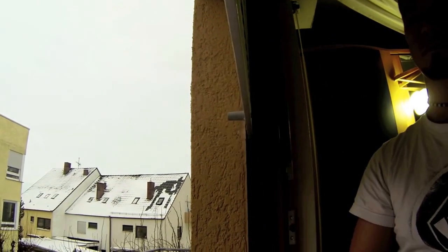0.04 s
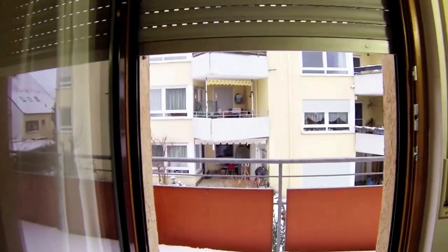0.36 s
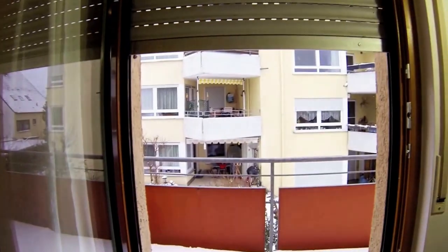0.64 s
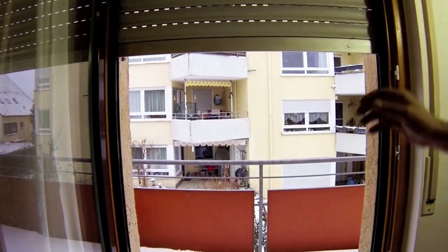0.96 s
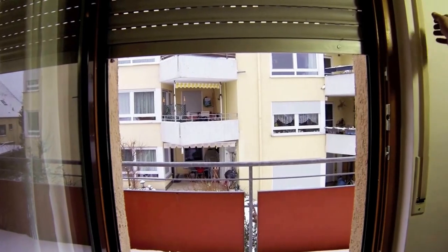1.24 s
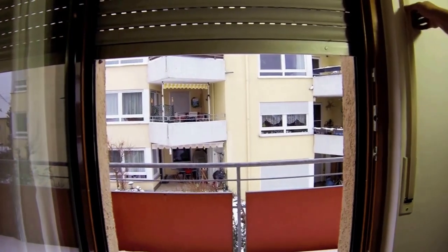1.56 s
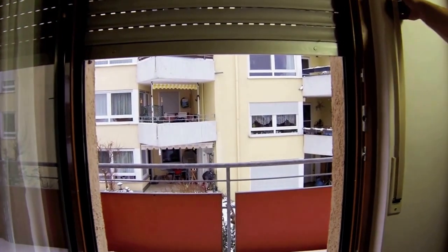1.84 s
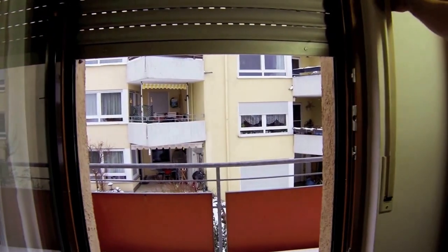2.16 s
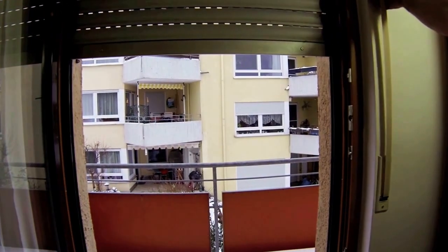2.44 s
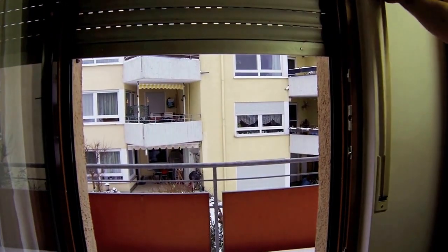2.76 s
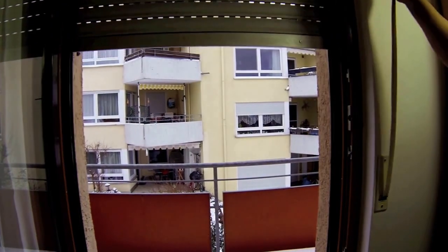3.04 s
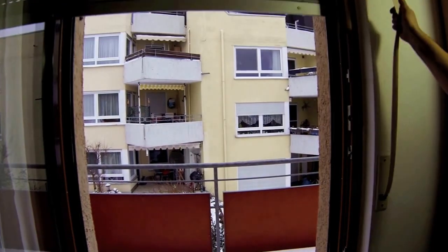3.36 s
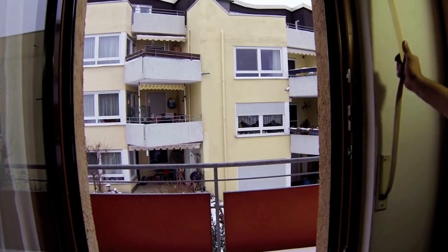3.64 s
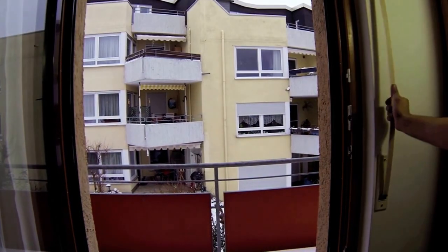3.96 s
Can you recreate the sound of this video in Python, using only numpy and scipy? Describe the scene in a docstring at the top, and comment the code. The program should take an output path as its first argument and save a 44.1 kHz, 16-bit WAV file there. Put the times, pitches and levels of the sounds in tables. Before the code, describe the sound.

Hands work a roller shutter strap, heard close through a plastic microphone case. A very faint outdoor hiss stops at 0.3 seconds. From 0.4 come irregular knocks, hollow taps, scuffs and rubbing over low thumps, with the sharpest knocks near 1.2 and 2 seconds and a short creak around 1.6. After 2.7 the handling softens, and the woven strap swishes at about 3.9.

```python
"""Inside a small plastic microphone case: hands grip a roller shutter's strap and haul the shutter up. Knocks,
hollow taps, scuffs and rubbing ring the case; each movement thumps and rumbles through it. Faint digital clicks
ride on the handling. The grip creaks once, and late on the woven strap swishes. The sound opens on a different
scene, a faint outdoor hiss with a few thin tones; after a third of a second the scene changes to the case, with
a brief hush between."""
import sys
import numpy as np
from scipy import signal
from scipy.fft import rfft, irfft
from scipy.io import wavfile
from scipy.ndimage import uniform_filter1d

SR = 44100
rng = np.random.default_rng(int(sys.argv[2]) if len(sys.argv) > 2 else 0)


def log_audio(samples):
    """Write samples as a 16-bit WAV file to the path given in sys.argv[1]."""
    # one column per channel
    frames = np.atleast_2d(samples).T
    # limit to full scale, then quantise
    limited = np.clip(frames, -1, 1)
    pcm = np.round(limited * 32767).astype(np.int16)
    wavfile.write(sys.argv[1], SR, pcm)


N = 176400
HIT_SAMPLES = 8192
TIME_S, HIT_TIME_S = np.arange(N) / SR, np.arange(HIT_SAMPLES) / SR
DIGITAL_TICK_HZ = (2000, 6500)


def from_db(db):
    """Decibels to gain."""
    return 10 ** (np.asarray(db) / 20)


def unit_rms(x):
    """Scale to unit power."""
    return x / np.sqrt(np.mean(x ** 2) + 1e-30)


def level(points):
    """Gain over time from (s, dB) points."""
    return from_db(np.interp(TIME_S, *np.transpose(points)))


def colour(x, points):
    """Shape a spectrum by (Hz, dB) points, falling off past the ends."""
    hz, db = np.transpose(points)
    log_f = np.log(np.maximum(np.fft.rfftfreq(N, 1 / SR), 1))
    outside = np.maximum(np.log(hz[0]) - log_f, 0) + np.maximum(log_f - np.log(hz[-1]), 0)
    return irfft(rfft(x) * from_db(np.interp(log_f, np.log(hz), db) - 20 * outside), N)


def noise(points):
    """Coloured noise of unit power."""
    return unit_rms(colour(rng.standard_normal(N), points))


def cut(x, hz, kind, order=2):
    """Butterworth filter."""
    return signal.sosfilt(signal.butter(order, hz, kind, fs=SR, output="sos"), x)


def flutter(depth_db, hz):
    """Gain wavering at random up to the given rate."""
    return from_db(depth_db * unit_rms(cut(rng.standard_normal(N), hz, "low")))


def ring(x, hz, t60_s):
    """One mode: a unit click rings with height 1."""
    r, w = np.exp(-np.log(1000) / (t60_s * SR)), 2 * np.pi * hz / SR
    return signal.lfilter([0, np.sin(w)], [1, -2 * r * np.cos(w), r * r], x + 1e-18)


def add(out, start_s, x):
    """Mix x into out."""
    i = int(start_s * SR)
    out[i:i + len(x)] += x[:N - i]


def impulses(samples, per_s=2600):
    """Random unit impulses of either sign."""
    return (rng.random(samples) < per_s / SR) * rng.choice([-1, 1], samples)


def outdoors():
    """Faint hiss with thin tones."""
    # Each row: frequency in Hz, level in dB.
    thin_tones = [(221, -68.5), (1455, -84.5), (7690, -101)]
    # Hiss spectrum. Each row: frequency in Hz, gain in dB.
    hiss_colour = [(130, -18), (230, 4), (800, -6.5), (1300, -1), (2200, -15.5), (5000, -23.5),
                   (10000, -27.5), (14000, -37)]
    tones = sum(from_db(db) * unit_rms(ring(rng.standard_normal(N), hz, t60_s=0.26))
                for hz, db in thin_tones)
    return from_db(-75.5) * noise(hiss_colour) + tones


def background(hush_from_s=0.308, hush_to_s=0.384, hush_db=-17, fade_s=0.02):
    """Low sway of the case and quiet room noise; both dip briefly as the outdoor sound stops."""
    # Each row: time in seconds, level in dB.
    sway_level = [(0, -43), (.31, -64), (.41, -51), (.57, -48.5), (1.6, -47), (2.72, -46), (2.83, -53),
                  (2.95, -49), (3.5, -49), (4, -54)]
    # Sway spectrum. Each row: frequency in Hz, gain in dB.
    sway_colour = [(15, -9), (27, -3), (42, -10), (62, -7), (85, -27.5), (400, -65.5)]
    # Room noise spectrum. Each row: frequency in Hz, gain in dB.
    room_colour = [(300, 0.5), (4000, -23), (15000, -29)]
    before, after = (uniform_filter1d(gate * 1., int(fade_s * SR))
                     for gate in (TIME_S < hush_from_s, TIME_S > hush_to_s))
    opening = before * outdoors()
    floor = noise(sway_colour) * level(sway_level) + from_db(-88) * noise(room_colour)
    return opening + floor * np.maximum(before + after, from_db(hush_db))


def room(x, tail_db=-25, t60_s=0.1):
    """Add a faint diffuse tail, dulled by the case."""
    t = np.arange(SR // 2) / SR
    tail = cut(rng.standard_normal(len(t)), [300, 3000], "band", order=4)
    tail *= np.exp(-np.log(1000) * t / t60_s)
    return x + from_db(tail_db) * signal.fftconvolve(x, tail / np.linalg.norm(tail))[:N]


def case(force, vary_db):
    """The plastic case's modes, weighted anew for each point of contact."""
    # Each row: frequency in Hz, mean gain in dB, T60 in seconds.
    modes = [(203.4, -14, 0.1), (343, -8, 0.065), (546, -3, 0.0092), (704.5, -8.5, 0.036),
             (1006, 0.5, 0.036), (1222, 8, 0.009), (1316, -0.5, 0.034), (1429, -2, 0.019),
             (1872, -3, 0.0092), (2304, -13.5, 0.027), (2748, -10.5, 0.016), (3808, -14, 0.022),
             (5510, -33, 0.0054), (6530, -5, 0.0083), (7920, -4.5, 0.0078)]
    return sum((-1) ** k * from_db(db + vary_db * rng.standard_normal()) * ring(force, hz, t60_s)
               for k, (hz, db, t60_s) in enumerate(modes))


def strap():
    """The woven strap hisses as it slides."""
    # Each row: time in seconds, level in dB.
    swish_level = [(3.08, -105), (3.13, -84.5), (3.58, -92.5), (3.65, -77), (3.86, -81.5), (3.885, -55.5),
                   (3.93, -67.5), (4, -82)]
    # Swish spectrum. Each row: frequency in Hz, gain in dB.
    swish_colour = [(500, -4), (900, -14), (1350, 6.5), (2100, -13), (2900, -9), (5000, -19), (7000, -31),
                    (13000, -42.5)]
    return noise(swish_colour) * flutter(depth_db=2, hz=110) * level(swish_level)


def creak(jitter=0.024, rough_hz=122):
    """The grip sticks and slips: a rough, sinking note that rings the case."""
    # Each row: time in seconds, level in dB, pitch in Hz.
    glide = [(1.529, -67, 1181), (1.548, -54.5, 1136), (1.581, -49, 989), (1.603, -52, 1005),
             (1.625, -58, 1013)]
    s, db, hz = np.transpose(glide)
    roughness = unit_rms(cut(rng.standard_normal(N), rough_hz, "low"))
    pitch_hz = np.interp(TIME_S, s, hz) * (1 + jitter * roughness)
    tone = np.sin(2 * np.pi * np.cumsum(pitch_hz) / SR) * flutter(depth_db=0.5, hz=rough_hz)
    body = cut(case(impulses(N), vary_db=3.5), [1000, 1500], "band")
    envelope = from_db(np.interp(TIME_S, s, db)) * (TIME_S > s[0]) * (TIME_S < s[-1])
    return envelope * (unit_rms(tone) + from_db(-2) * unit_rms(body))


def rubbing(rumble_hz=(69, 140.3), clicks_per_s=25):
    """Dense slips of the grip ring the case over a rumble; faint digital clicks follow the loudness."""
    # Rubbing in three phases. Each row: time in seconds, level in dB.
    grip = [(0.381, -86.5), (0.55, -64.5), (0.585, -57), (0.61, -65.5), (0.701, -72), (0.798, -66),
            (0.878, -82), (1.23, -89), (1.341, -65.5)]
    reach = [(1.416, -82.5), (1.492, -59.5), (1.621, -55.5), (1.678, -68), (1.764, -77.5), (1.87, -65),
             (1.939, -84)]
    pull = [(2.122, -68), (2.172, -59.5), (2.273, -78.5), (2.323, -68), (2.372, -95), (2.438, -69.5),
            (2.521, -85), (2.65, -65), (2.722, -96.5), (3.1, -91.5), (3.168, -70), (3.302, -88.5),
            (3.343, -64.5), (3.42, -83), (3.648, -75), (4, -89)]
    # Tone curve. Each row: frequency in Hz, gain in dB.
    rub_colour = [(60, 0), (120, 19), (220, 15), (380, 7.5), (750, -1.5), (1300, -4), (2200, -3),
                  (4300, -24), (7000, -53.5)]
    envelope = level([(0.3, -110), *grip, *reach, *pull])
    slips = impulses(N) * flutter(depth_db=5.5, hz=41)
    rub = colour(case(slips, vary_db=-0.5), rub_colour)
    rub /= np.std(cut(rub, [800, 2500], "band"))
    rumble = from_db(-23) * unit_rms(cut(rng.standard_normal(N), rumble_hz, "band", order=3))
    spikes = (rng.random(N) < clicks_per_s / SR) + 1e-18
    digital_clicks = from_db(-67) * unit_rms(cut(spikes, DIGITAL_TICK_HZ, "band"))
    return envelope * rub + np.sqrt(envelope) * (rumble + digital_clicks)


def bumps(wobble_hz=48.4, thud_hz=105, tick_s=0.0087, tick_db=-33):
    """Soft pushes of the hand: a low wobble and short thud, with a faint high digital tick on each."""
    # Each row: start in seconds, wobble peak in dB, thud in dB against the wobble.
    pushes = [(0.737, -34.5, -7), (0.838, -37.5, -25), (0.983, -43.5, 4.5), (1.01, -44, 12.5),
              (1.2, -39.5, 2), (1.461, -39, 2), (1.917, -40, -0.5), (2.302, -37, -1), (2.626, -50, 11),
              (2.929, -37, -37), (3.344, -42.5, -31.5), (3.491, -38, 2)]
    force = cut(signal.unit_impulse(HIT_SAMPLES), 270, "low")
    wobble = cut(ring(force, wobble_hz, t60_s=0.06), wobble_hz / 2, "high", order=1)
    thud = cut(ring(force, thud_hz, t60_s=0.01), thud_hz / 2, "high", order=1)
    out = np.zeros(N)
    for start_s, db, thud_db in pushes:
        thump = wobble / wobble.max() + from_db(thud_db) * thud / thud.max()
        burst = impulses(HIT_SAMPLES) * np.exp(-(HIT_TIME_S / tick_s) ** 2 / 2)
        digital_tick = cut(burst, DIGITAL_TICK_HZ, "band")
        digital_tick *= from_db(tick_db) / np.abs(digital_tick).max()
        add(out, start_s, from_db(db) * (thump + digital_tick))
    return out


def balance(x, bass_db, upper_db, treble_db):
    """Smooth causal tone curve: bring three bands toward their levels against the middle band."""
    edges_hz = np.array([200, 900, 2100, 4600, 12000])
    spectrum, hz = rfft(x), np.fft.rfftfreq(HIT_SAMPLES, 1 / SR)
    bands = [(hz > low) & (hz < high) for low, high in zip(edges_hz, edges_hz[1:])]
    log_centres = np.log(edges_hz[1:] * edges_hz[:-1]) / 2
    wanted = np.log(from_db([bass_db, 0, upper_db, treble_db]))
    log_gain = np.zeros(len(hz))
    for _ in range(5):
        shaped = spectrum * np.exp(log_gain)
        have = np.log([np.linalg.norm(shaped[band]) for band in bands])
        log_gain += np.interp(np.log(hz + 1), log_centres, wanted - have) / 2
    # Minimum phase: nothing sounds ahead of the touch.
    cepstrum = irfft(log_gain, HIT_SAMPLES)
    cepstrum[1:HIT_SAMPLES // 2] *= 2
    cepstrum[HIT_SAMPLES // 2 + 1:] = 0
    return irfft(spectrum * np.exp(rfft(cepstrum)), HIT_SAMPLES)


def contact(force, note, mid_peak_db, balance_db):
    """A force rings the case, with a short crack, a snap and any note of the struck spot."""
    crack = from_db(2.5) * ring(force, hz=1716, t60_s=0.0073)
    snap = from_db(14) * cut(force, 5000, "low", order=1)
    hit = cut(note + case(force, vary_db=6) + crack + snap, 160, "high")
    hit = balance(hit, *balance_db)
    return from_db(mid_peak_db) * hit / np.abs(cut(hit, [900, 2100], "band")).max()


def spot(hz, gain_db):
    """The struck spot's own note."""
    return from_db(gain_db) * ring(signal.unit_impulse(HIT_SAMPLES), hz, t60_s=0.028)


def scuffs(width_s=0.0073, gain_db=16):
    """Short runs of slips on the case that stop quickly."""
    # Each row: start in seconds, level in dB, then bass, upper middle, treble in dB against the middle.
    runs = [(0.7436, -55.5, -3, -6, -30.5), (0.9612, -53.5, -7, -6.5, -43),
            (1.0266, -62.5, -9, -6.5, -31.5), (0.622, -62.5, -10.5, -13, -37),
            (1.8471, -62.5, -3.5, -13, -44), (2.918, -76, 12, -13, -35.5), (3.45, -71, 8, -22, -32)]
    out = np.zeros(N)
    for start_s, db, *balance_db in runs:
        slips = impulses(HIT_SAMPLES) * np.exp(-(HIT_TIME_S / width_s) ** 2 / 2)
        add(out, start_s, contact(slips, 0, db + gain_db, balance_db))
    return out


def taps(decay_s=0.0086, balance_db=(-8, -21, -46.5)):
    """Soft gritty touches; the spot's hollow note stands out."""
    # Each row: start in seconds, middle-band peak in dB, note in Hz.
    touches = [(0.5439, -38.5, 1226), (0.626, -48.5, 1360), (0.7048, -50.5, 1200), (0.777, -56, 1270),
               (1.089, -58.5, 1240), (1.1177, -51, 1430), (1.453, -50, 1490), (2.4897, -48, 1406),
               (2.5387, -47, 1205), (2.594, -55.5, 1320), (2.629, -40, 1366), (2.648, -58.5, 1060),
               (2.685, -51, 1310), (2.889, -66.5, 1340)]
    out = np.zeros(N)
    for start_s, db, hz in touches:
        force = impulses(HIT_SAMPLES) * np.exp(-HIT_TIME_S / decay_s)
        force /= np.linalg.norm(force) + 1e-9
        add(out, start_s, contact(force, spot(hz, gain_db=15), db, balance_db))
    return out


def knocks(grit_s=0.0011, gain_db=1.5):
    """Hard touches, each a click and a moment of grit; thin metal rings on."""
    # Each row: start in seconds, level in dB, then bass, upper middle, treble in dB against the middle,
    # note in Hz.
    hits = [(0.414, -41, -11.5, -9, -42.5, 1364), (0.5056, -36, -13, -17.5, -58, 1574),
            (0.5663, -33.5, 2, -10, -37, 683), (0.5848, -41.5, 1, -4.5, -25, 1800),
            (0.7373, -40, -4, -16.5, -50, 1486), (1.0079, -53, 8.5, -15.5, -26, 1370),
            (1.1582, -28, -13, -7, -31, 1256), (1.258, -37.5, -6.5, -5.5, -24.5, 1557),
            (1.686, -39, 1, -12, -38, 737), (1.7856, -33, -4.5, -7.5, -37.5, 1710),
            (2.0001, -27.5, -6.5, -7.5, -29.5, 1508), (2.051, -35.5, 0, -3.5, -21.5, 1370),
            (3.3643, -47.5, -2, -17, -50, 1003), (3.4821, -50.5, 9.5, -23, -42, 1123),
            (3.579, -48.5, -18, -6, -38, 1272)]
    # Each row: frequency in Hz, gain in dB, T60 in seconds.
    metal_modes = [(2370, -39.5, 0.2), (3400, -52.5, 0.5)]
    out, blows = np.zeros(N), np.zeros(N)
    for start_s, db, *balance_db, hz in hits:
        grit = rng.standard_normal(HIT_SAMPLES) * np.exp(-HIT_TIME_S / grit_s)
        force = signal.unit_impulse(HIT_SAMPLES) + grit / np.linalg.norm(grit)
        add(out, start_s, contact(force, spot(hz, gain_db=6.5), db + gain_db, balance_db))
        add(blows, start_s, from_db([db]))
    return out + sum(from_db(db) * ring(blows, hz, t60_s) for hz, db, t60_s in metal_modes)


def scene():
    """All sources at one microphone."""
    return (room(knocks() + taps() + scuffs()) + bumps() + rubbing() + creak() + strap() + background())[None]


def record(dry):
    """Round the hardest peaks; cut the top steeply."""
    ceiling, stop_hz = 0.053, 15800
    rounded = ceiling * np.tanh(dry / ceiling)
    return signal.sosfilt(signal.cheby2(12, 70, stop_hz, fs=SR, output="sos"), rounded)


dry = scene()
out = record(dry)
log_audio(out)
```